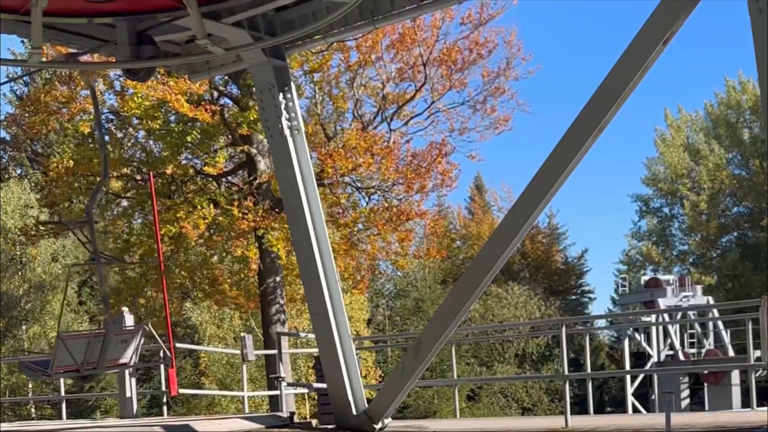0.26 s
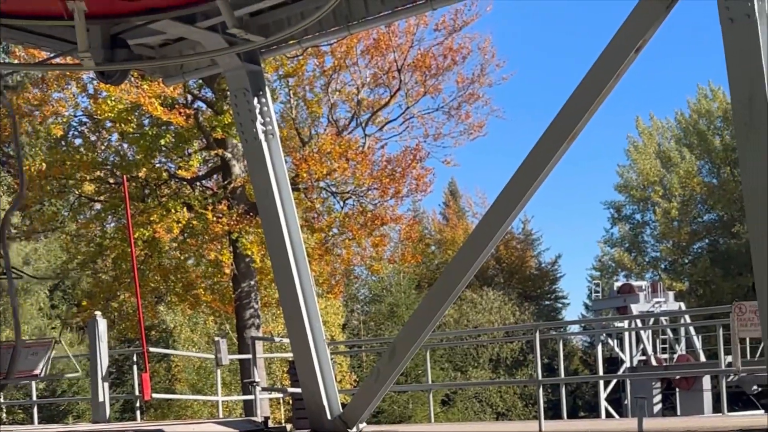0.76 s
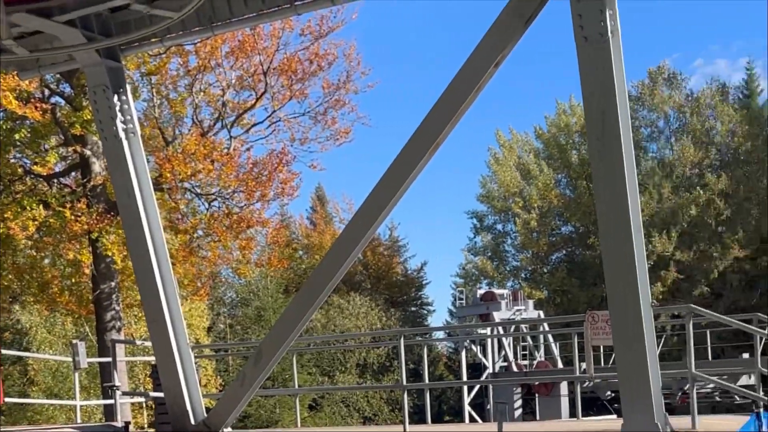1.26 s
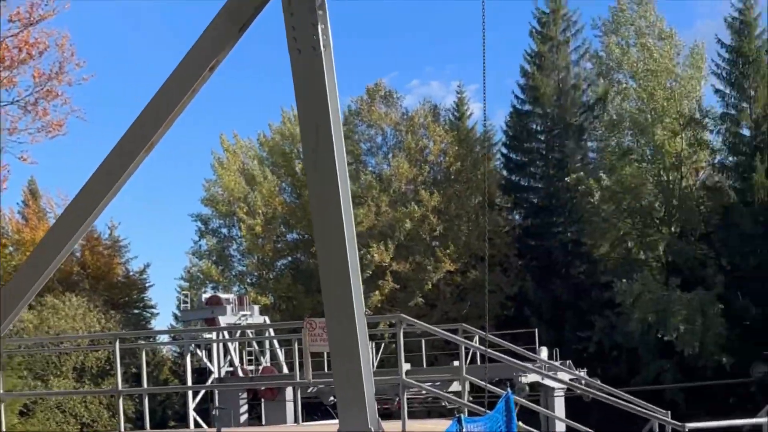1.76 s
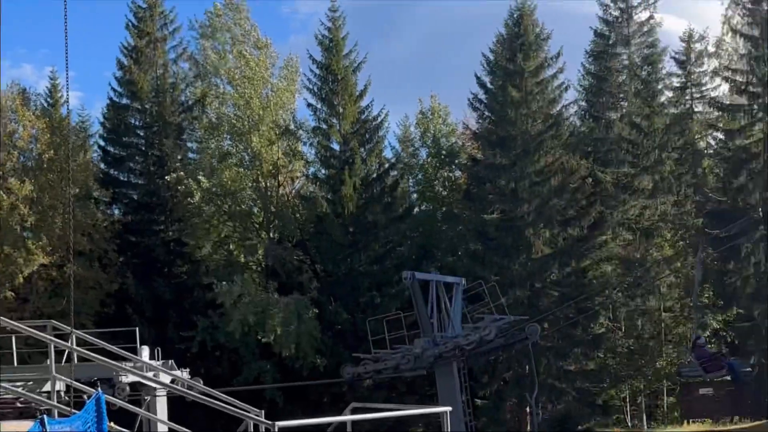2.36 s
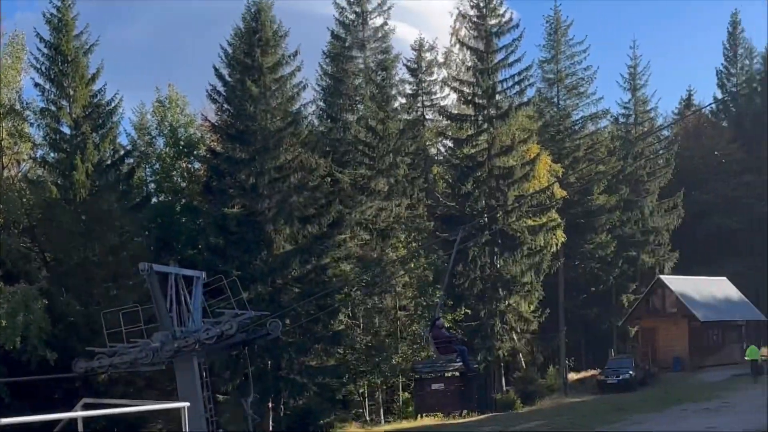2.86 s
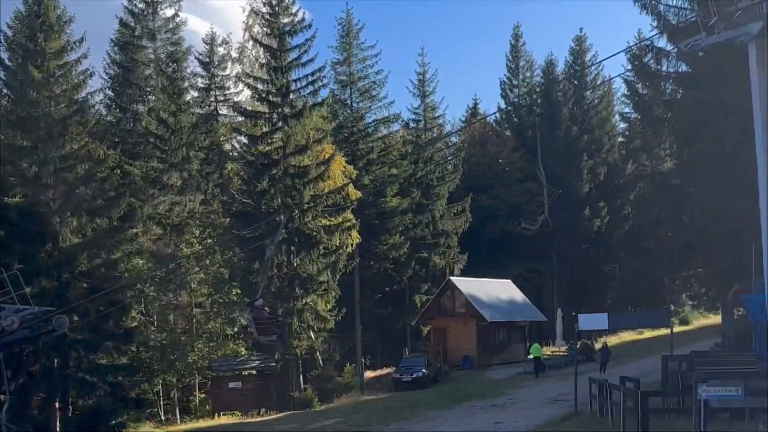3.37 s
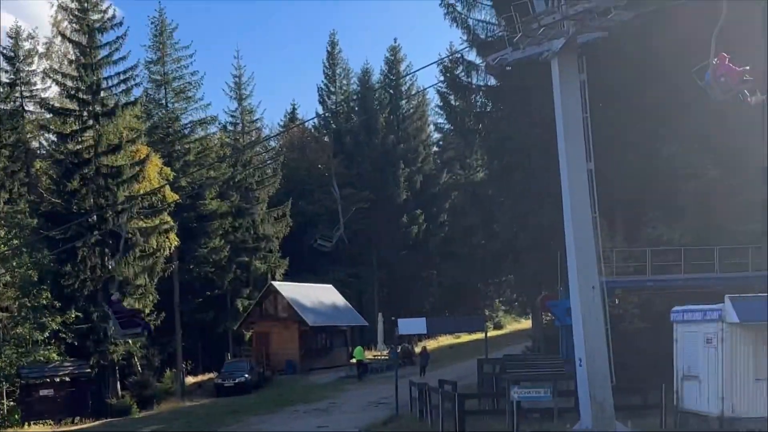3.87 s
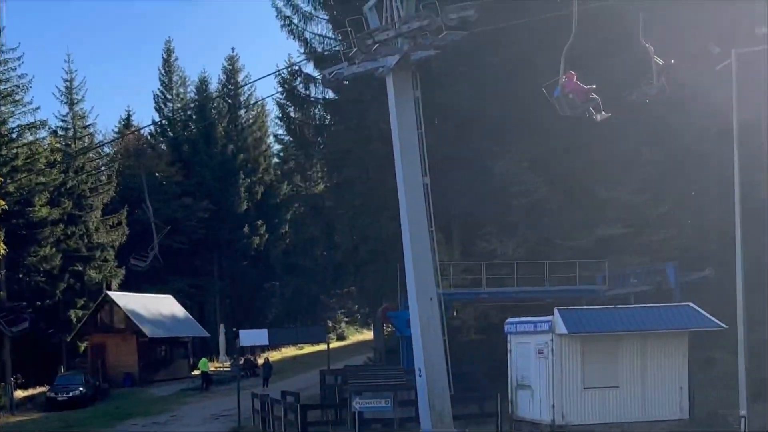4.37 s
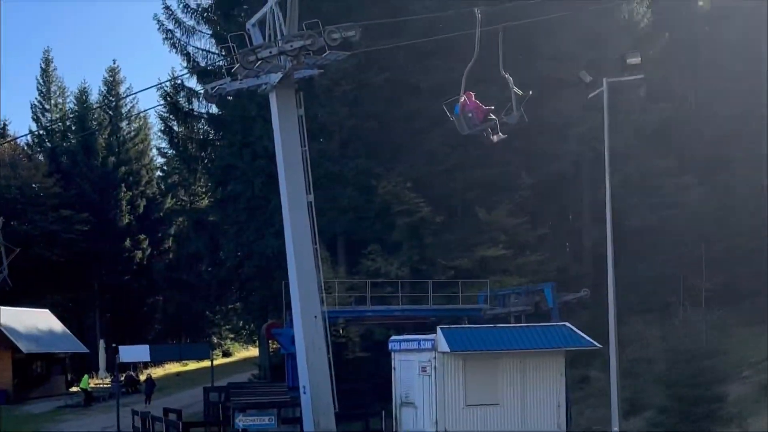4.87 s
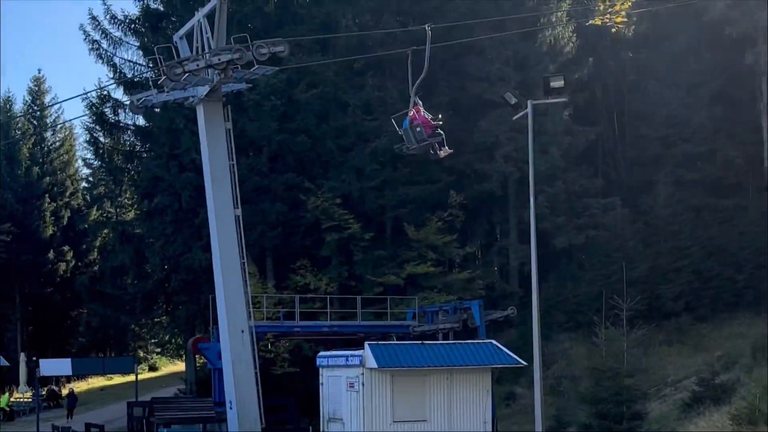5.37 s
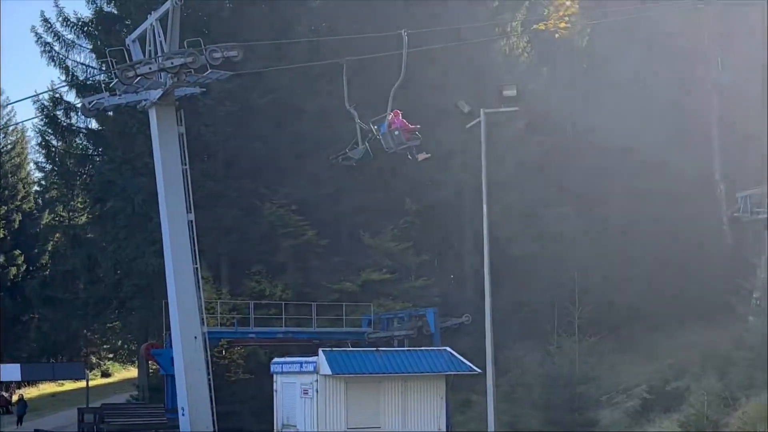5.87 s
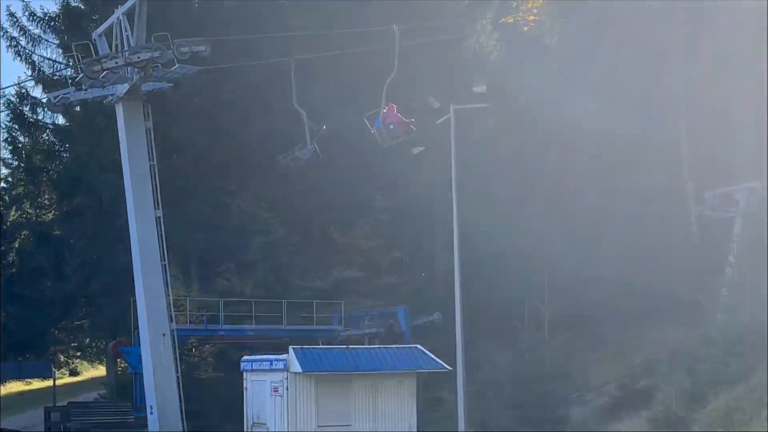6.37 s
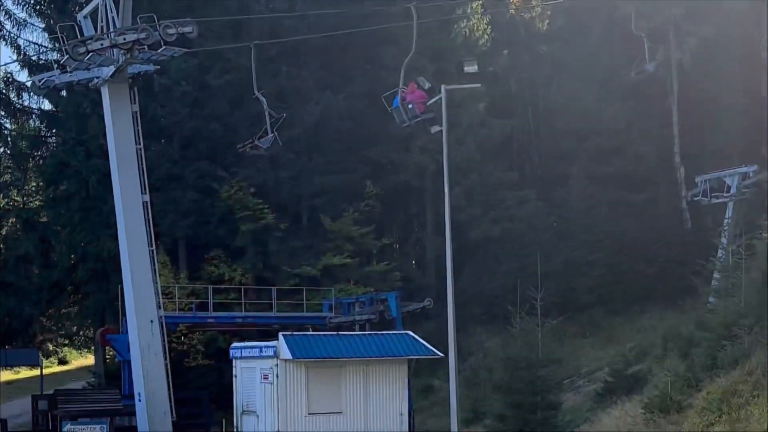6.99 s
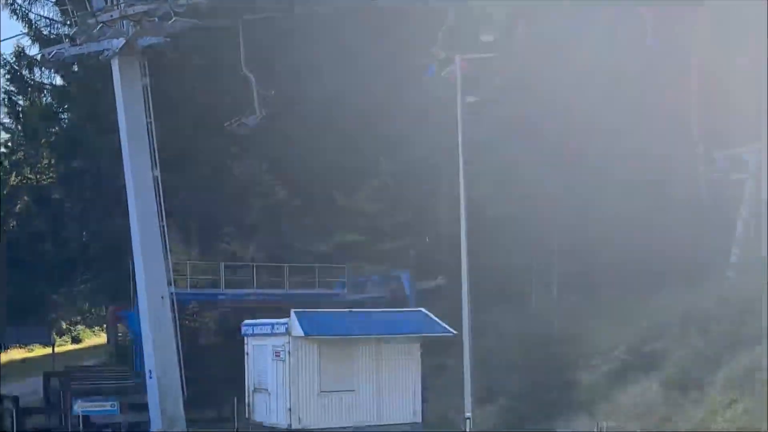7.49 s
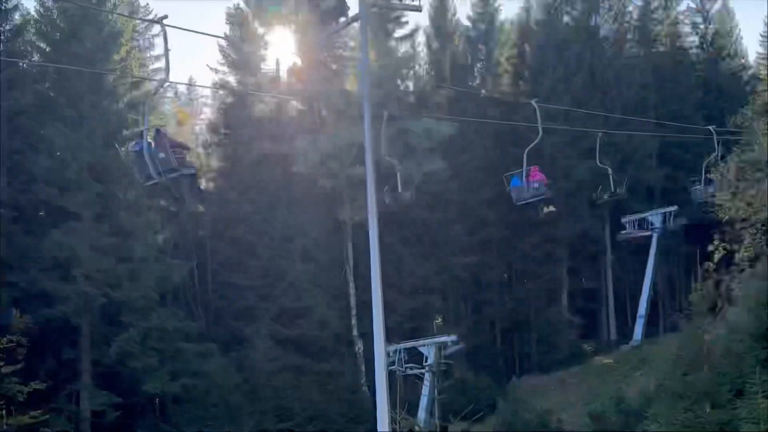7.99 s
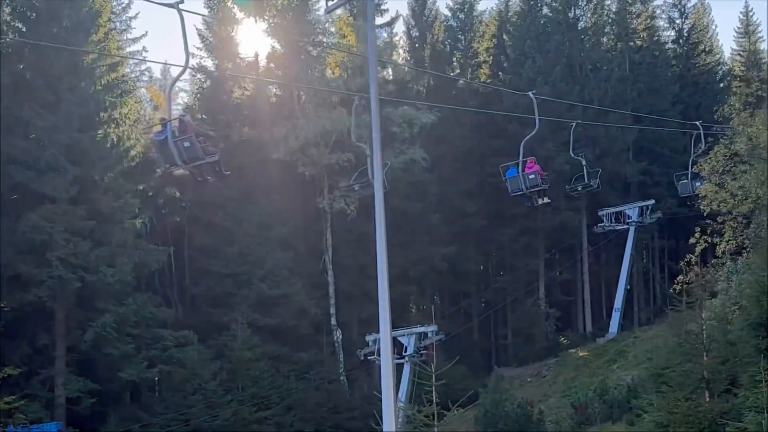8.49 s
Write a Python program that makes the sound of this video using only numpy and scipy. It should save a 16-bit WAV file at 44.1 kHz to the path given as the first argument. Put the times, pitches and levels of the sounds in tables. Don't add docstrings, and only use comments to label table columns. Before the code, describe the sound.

A chairlift drive drones loudly and steadily outdoors while shoes scuff grit nearby, then a click cuts to soft wind buffeting and forest hiss.

```python
import sys
import numpy as np
from scipy import signal
from scipy.fft import rfft, irfft, next_fast_len
from scipy.io import wavfile
from scipy.ndimage import uniform_filter1d, map_coordinates

SR = 44100
rng = np.random.default_rng(int(sys.argv[2]) if len(sys.argv) > 2 else 0)


def voltage_ratio(decibels):
    exponent = np.asarray(decibels, float) / 20
    return 10 ** exponent


def generate_wav(signal):
    frames = np.transpose(np.atleast_2d(signal))
    scaled = np.clip(frames, -1, 1) * 32767
    pcm = np.round(scaled).astype(np.int16)
    wavfile.write(sys.argv[1], SR, pcm)


N = 385434
CHANGE_S = 7.9278

HEADING_TIMES = [1, 2.63, 6.04]
# (frequency [Hz], level [dB per Hz])
FRAME_COLOUR = [(12, -58), (20, -36), (43, -17.5), (71, -15.5), (140, -5.5), (195, -9.5), (258, -11.5),
                (323, -9.5), (422, -19.5), (700, -33), (910, -61.5), (1540, -120)]
# (frequency [Hz], side minus mid [dB])
FRAME_WIDTH = [(60, -14), (110, -32.5), (190, -30), (340, -25), (600, -6), (1080, -8), (1920, 2),
               (3410, 13.5), (6080, -1), (10800, 9.5)]
# (frequency [Hz], side minus mid [dB])
WIND_WIDTH = [(60, -16), (110, -3), (190, -0.5), (340, 4), (600, 7), (1080, 8.5), (1920, 0), (3410, -1.5),
              (6080, 0.5), (10800, 0.5)]


def unit(x):
    return x / np.sqrt(np.mean(x ** 2) + 1e-20)


def along(points, hz):
    f, v = np.transpose(points)
    return np.interp(np.log(hz + 1), np.log(f + 1), v)


def curves(rows):
    s, *columns = np.transpose(rows)
    return [np.interp(np.arange(N) / SR, s, column) for column in columns]


def wobble(rate):
    at = np.arange(0, N + 32, 32)
    knots = rng.standard_normal(int(N * rate / SR) + 4)
    return np.interp(np.arange(N), at, map_coordinates(knots, [at * rate / SR]))


def filtered(x, response):
    size = next_fast_len(N + 8192)
    hz = np.fft.rfftfreq(size, 1 / SR)
    return irfft(rfft(x, size) * response(hz), size)[..., :N]


def rush(mid_db, side_db, link, patchy_db):
    # (frequency [Hz], phase [radians])
    left_lead = [(0, 7), (520, -1), (1210, -1), (1640, 1.5), (2670, -1.5), (4130, -4.5), (4740, 4),
                 (5170, -12.5), (5510, -7.5), (6980, -8), (8270, -7.5), (9730, -2), (10300, -13),
                 (11000, -12.5)]
    grid = signal.stft(rng.standard_normal((2, N)), nperseg=512)[2]
    patches = uniform_filter1d(rng.standard_normal(grid.shape[1:]), size=6, axis=0)
    patches = unit(uniform_filter1d(patches, size=12, axis=1))
    a, b = signal.istft(grid * voltage_ratio(patchy_db * patches), nperseg=512)[1][:, :N]

    def share(hz):
        return np.clip(link, 0, 1) * np.sin(along(left_lead, hz))

    mid = filtered(a, lambda hz: voltage_ratio(mid_db(hz)))
    side = filtered(a, lambda hz: voltage_ratio(side_db(hz)) * 1j * share(hz))
    side = side + filtered(b, lambda hz: voltage_ratio(side_db(hz)) * np.sqrt(1 - share(hz) ** 2))
    return np.array([mid + side, mid - side]) / np.std(mid)


def paired(colour, width, link, patchy_db):
    return rush(lambda hz: along(colour, hz), lambda hz: along(colour, hz) + along(width, hz), link, patchy_db)


def bursts(rows, bed_db):
    t = np.arange(0, N, 32) / SR
    swells = 0
    for s, db, rise, fall in rows:
        swells = swells + voltage_ratio(db - 20 * np.maximum((s - t) / abs(rise), (t - s) / abs(fall)))
    return voltage_ratio(bed_db) + np.interp(np.arange(N) / SR, t, swells)


def pops(rows, cycles):
    half = SR // 20
    out = np.zeros((2, N + SR))
    t = np.arange(-half, half) / SR
    for s, db, hz, pan_db, sign in rows:
        bell = np.exp(-(t * hz / cycles) ** 2 / 2)
        pop = bell * np.sin(2 * np.pi * (hz * t + rng.random())) * [[1], [sign]]
        out[:, round(s * SR) - half:][:, :len(t)] += voltage_ratio(db + np.minimum([[pan_db], [-pan_db]], 0)) * pop
    return out[:, :N]


def tone(turns, hz, level_db, drift, swim_db=0):
    step = 64

    def slow(rate):
        return map_coordinates(rng.standard_normal(40), [np.arange(0, N, step) * rate / SR])

    wide = min(hz / 600, 1) ** 2
    lead = min(hz, 1000) / 1700 + 0.12 * wide * slow(1.229)
    lean_db = 3 * wide * slow(1.218)
    gain = np.sqrt(2) * voltage_ratio(level_db[::step] + swim_db * slow(1.434) + [lean_db, -lean_db])
    shift = 2 * np.pi * rng.random() + drift * slow(3.5) + [lead, -lead]
    gain = np.repeat(gain, step, axis=1)[:, :N]
    shift = np.repeat(shift, step, axis=1)[:, :N]
    return gain * np.sin(np.float32(2 * np.pi * (turns % 1) + shift))


def forest():
    # (frequency [Hz], level [dB per Hz])
    leaf_colour = [(600, -19), (1200, -8.5), (2500, -15.5), (5000, -17), (8000, -27), (11000, -44),
                   (15500, -49)]
    fade_in = np.clip((np.arange(N) / SR - CHANGE_S) / 0.062, 0, 1)
    return voltage_ratio(-47) * fade_in * paired(leaf_colour, WIND_WIDTH, link=.2, patchy_db=1.8)


def wind_buffets():
    # (time [s], thud [dB], flutter [dB])
    gusts = [(7.972, -18.5, -28), (7.985, -22, -16.5), (8.0, -37, -29), (8.033, -23, -20),
             (8.066, -28, -26), (8.1, -23, -27.5), (8.195, -35, -27), (8.218, -21, -28.5), (8.27, -30, -50),
             (8.292, -26, -28), (8.343, -23, -28), (8.38, -24, -27), (8.415, -25, -50), (8.49, -28, -31),
             (8.52, -23, -28), (8.575, -46, -38), (8.62, -34, -31), (8.655, -30, -32)]
    # (frequency [Hz], level [dB per Hz])
    thud_colour = [(12, -45), (20, -52), (62, -1), (173, -12), (236, -12), (400, -24.5), (520, -61),
                   (880, -120)]
    # (frequency [Hz], level [dB per Hz])
    flutter_colour = [(88, -26), (150, -10), (236, -2), (272, 0), (641, -7), (1000, -16.5), (1350, -38),
                      (2600, -63), (4400, -120)]
    thuds = bursts([(s, db, 0.061, 0.061) for s, db, _ in gusts], bed_db=-32)
    flutters = bursts([(s, db, 0.021, 0.018) for s, _, db in gusts], bed_db=-37.5)
    fade_in = np.clip((np.arange(N) / SR - CHANGE_S) / .05, 0, 1) ** 2
    unrest = fade_in * voltage_ratio(1.5 * np.array([wobble(60), wobble(60)]))
    thud = thuds * voltage_ratio(-1.0) * unrest * paired(thud_colour, WIND_WIDTH, link=0, patchy_db=0.0)
    flutter = flutters * voltage_ratio(-2.0) * unrest * paired(flutter_colour, WIND_WIDTH, link=0, patchy_db=-2.0)
    return thud + flutter


def wind_pops():
    # time [s], peak [dB], pitch [Hz], left-right [dB], ports together 1 or opposed -1
    first_whirl = (7.972, -13, 280, 4, 1)
    # (time [s], peak [dB], pitch [Hz], left-right [dB], ports together 1 or opposed -1)
    whirls = [(7.985, -10, 403, 7, 1), (8.012, -19, 403, 11, -1), (8.018, -17, 143, 15, 1),
              (8.028, -21, 508, 9, -1), (8.035, -15, 254, 4, 1), (8.048, -23, 640, -10, -1),
              (8.073, -23, 570, 6, -1), (8.115, -21, 508, -1, -1), (8.19, -23, 640, -2, -1),
              (8.197, -18, 453, 4, -1), (8.21, -16, 254, 9, -1), (8.212, -21, 570, -5, -1),
              (8.216, -19, 359, -9, -1), (8.232, -21, 508, -8, -1), (8.238, -18, 143, -11, 1),
              (8.276, -20, 254, 4, -1), (8.287, -16, 143, -6, -1), (8.288, -19, 640, -3, -1),
              (8.332, -17, 403, -5, -1), (8.334, -22, 905, 2, -1), (8.338, -16, 160, -3, 1),
              (8.351, -21, 570, -1, -1), (8.352, -19, 320, 11, -1), (8.383, -19, 226, 5, 1),
              (8.385, -21, 570, -4, -1), (8.425, -20, 403, 4, -1), (8.472, -18, 143, -8, -1),
              (8.505, -19, 453, -2, -1), (8.516, -20, 285, 7, 1), (8.518, -19, 180, 4, 1),
              (8.541, -20, 254, -15, -1), (8.565, -24, 508, -2, -1), (8.624, -22, 113, 7, 1),
              (8.656, -23, 160, 8, -1), (8.662, -27, 718, -2, -1), (8.662, -23, 254, 5, 1),
              (8.695, -21, 101, 15, 1), (8.697, -28, 905, -2, -1), (8.721, -27, 640, 1, -1)]
    # (time [s], peak [dB], pitch [Hz], left-right [dB])
    slaps = [
        (8.213, -28, 530, 5),
        (8.292, -25, 554, 8),
        (8.296, -33, 780, 2),
        (8.383, -29, 740, 2),
        (8.464, -38, 675, 2),
        (8.516, -43, 6000, 0),
        (8.517, -45, 9200, 0),
    ]
    together = [(*row, 1) for row in slaps]
    return voltage_ratio(0.5) * pops([first_whirl] + whirls + together, cycles=1.55)


def wind():
    return wind_buffets() + forest() + wind_pops()


def scuffs():
    # (time of peak [s], fizz [dB], rise [s], fall [s], scrape above fizz [dB])
    drags = [(0, -48.5, .02, .2, 5.5), (.12, -46.5, 0.055, 0.14, 6.5), (.47, -49.5, 0.055, 0.056, -5),
             (1.43, -43.5, 0.57, 0.19, 1.5), (1.57, -40, 0.3, 0.071, -3.5), (1.7, -59.5, .05, 0.19, 2),
             (1.87, -58.5, 0.07, 0.42, 3.5), (2.472, -46.5, 0.044, 0.087, 7.5),
             (2.746, -52.5, 0.35, .2, 13), (2.85, -39, 0.068, 0.18, -3), (3.1, -52.5, 0.062, .11, 6),
             (3.15, -37, 0.006, .08, -1), (3.195, -31.5, 0.058, 0.13, 6.5), (3.26, -42, 0.077, 0.26, 8),
             (3.531, -49, 0.14, 0.17, 7.5), (3.63, -53.5, 0.051, 0.095, 14.5)]
    # (frequency [Hz], level [dB per Hz])
    fizz_colour = [(2000, -31), (3500, 0), (6000, 9), (8000, 0), (11000, -13), (15000, -13.5)]
    # (frequency [Hz], level [dB per Hz])
    scrape_colour = [(300, -11.5), (700, 5.5), (1000, -0.5), (1500, -1), (3000, -5.5), (5000, -14.5),
                     (8000, -34.5), (12000, -63)]
    shuffle_db = -51.5 - 20 * np.maximum(np.arange(N) / SR - 2.9, 0) / .9
    fizz = bursts([row[:4] for row in drags], shuffle_db)
    scrape = bursts([(s, db + above_db, rise, fall) for s, db, rise, fall, above_db in drags], shuffle_db + 0.5)
    grains = voltage_ratio(1.1 * wobble(300) + 0.97 * wobble(45))
    out = fizz * grains * paired(fizz_colour, [(3000, 1.5)], link=.4, patchy_db=2.5)
    return out + scrape * grains * paired(scrape_colour, [(500, -4), (4000, 1.5)], link=.4, patchy_db=2.5)


def stone_ticks():
    # (time [s], peak [dB], pitch [Hz], left-right [dB])
    knocked = [
        (2.469, -29.5, 5200, 0.5),
        (2.6592, -35, 4130, 14),
        (3.147, -16, 4640, -2),
        (3.1867, -52.5, 5830, 1),
        (3.218, -29.5, 3600, -7.5),
        (3.63, -35, 4080, 5.5),
        (3.6986, -34.5, 3800, 4.5),
        (3.9328, -26, 4970, 0),
    ]
    out = np.zeros((2, N))
    t = np.arange(SR // 20) / SR
    for s, db, hz, pan_db in knocked:
        ring = np.sin(2 * np.pi * hz * t + [[1.2], [-0.6]]) * voltage_ratio(-60 * t / 0.04)
        crack = 0.98 * rng.standard_normal((2, len(t))) * voltage_ratio(-60 * t / .025)
        gain = voltage_ratio(db + 0.5 + np.array([[pan_db], [-pan_db]]) / 2)
        out[:, round(s * SR):][:, :len(t)] += gain * (ring + crack)
    return filtered(out, lambda hz: (1j * hz * 4000 / (4300 ** 2 - hz ** 2 + 1j * hz * 4000)) ** 2)


def pebbles():
    # (time [s], peak [dB], pitch [Hz], left-right [dB])
    clacks = [(2.472, -34, 2300, 0), (2.478, -32, 2000, -2), (3.171, -30, 1550, 0), (3.184, -26, 960, 1),
              (3.19, -30, 2960, 0), (3.196, -29, 1700, 0), (3.207, -24, 910, 0), (3.212, -27, 2480, -4),
              (3.225, -28, 2440, -3), (3.25, -26, 1010, 0), (3.271, -26, 900, 0), (3.632, -35, 2100, 0),
              (3.635, -36, 4500, 2), (3.934, -35, 3900, -3), (3.935, -37, 2500, -3), (3.944, -37, 5000, -2),
              (3.957, -35, 5000, -2), (4.2, -28, 686, 9), (5.97, -26, 740, 0), (7.13, -30, 700, 4),
              (7.18, -31, 690, 4)]
    # (time [s], peak [dB], pitch [Hz], left-right [dB])
    snaps = [(2.47, -33, 4800, -4), (2.471, -36, 9500, -2), (2.669, -33, 4276, 15), (2.75, -32, 4000, 0),
             (2.852, -33, 6788, 1), (2.855, -37, 9500, -1), (2.828, -34, 5960, 0), (3.148, -34, 7600, -1),
             (3.149, -29, 1890, 0), (3.149, -31, 10700, -1), (3.189, -35, 6788, 0), (3.209, -27, 3394, 6),
             (3.214, -34, 6788, -7), (3.222, -37, 3850, 10), (3.225, -33, 6788, 3)]
    return pops([(*row, 1) for row in clacks + snaps], cycles=4.6)


def squeak():
    band = [(3400, -39.0), (4100, 6.5), (4500, -6), (4900, -12), (5400, -36.5)]  # (Hz, dB per Hz)
    twist = bursts([(2.662, -40, .015, .16)], bed_db=-120)
    return twist * paired(band, [(4000, 7)], link=.4, patchy_db=3.0)


def shoes():
    return scuffs() + stone_ticks() + pebbles() + squeak()


def fan_rush(rush_db):
    # (frequency [Hz], level [dB per Hz])
    mid_colour = [(240, -26), (400, -1), (615, -7), (668, -9), (800, -8.5), (1890, -23.5), (2200, -21),
                  (6490, -33), (9580, -46.5), (11000, -63.5), (14300, -91), (22000, -120)]
    # (frequency [Hz], level [dB per Hz])
    side_colour = [(240, -38), (400, -9.5), (590, -6), (850, -12), (1210, -15.5), (1900, -26.5),
                   (2150, -19), (2700, -20), (4800, -31), (5500, -24), (8000, -40.5), (11300, -54.5),
                   (15500, -60.5)]
    air = rush(lambda hz: along(mid_colour, hz), lambda hz: along(side_colour, hz) + 0.4, link=.85, patchy_db=1)
    return voltage_ratio(rush_db + 5.5) * air


def frame_rumble(rush_db):
    rumble = paired(FRAME_COLOUR, FRAME_WIDTH, link=.6, patchy_db=2.0)
    return voltage_ratio(-21.0 + 1.38 * (rush_db + 34.0)) * rumble


def frame_knocks():
    # (time [s], level [dB])
    jolts = [(.88, -13), (1.34, -19), (1.48, -18), (1.81, -36), (2.6, -29), (4.26, -24), (4.92, -20.5),
             (5.16, -16), (5.4, -24.5), (5.559, -23.5), (5.93, -17), (6.2, -21), (6.55, -16.5), (6.87, -21),
             (7.52, -18), (7.83, -25)]
    gain = bursts([(s, db, 0.15, 0.048) for s, db in jolts], bed_db=-29.5)
    lows = [(hz, db - 30 * (hz > 100)) for hz, db in FRAME_COLOUR]
    return gain * voltage_ratio(-7.5 + 2.2 * wobble(9)) * paired(lows, FRAME_WIDTH, link=.3, patchy_db=-0.5)


def machine_noise():
    heard_db = (-35, -35, -37)
    rush_db = np.interp(np.arange(N) / SR, HEADING_TIMES, heard_db) + .2 * wobble(2.5) + .3 * wobble(6.5)
    return frame_knocks() + frame_rumble(rush_db) + fan_rush(rush_db)


def electric_hum():
    # (time [s], level [dB])
    swell = [(0.0, -42), (0.15, -25), (0.26, -33), (2.03, -23.5), (2.65, -32), (3.31, -21.5), (3.57, -37.5),
             (4.28, -22), (4.43, -37.5), (4.79, -22.5), (4.94, -40.5), (5.27, -24), (5.84, -38.5),
             (6.04, -19.5), (6.17, -41.5), (6.53, -24), (7.19, -37), (7.92, -30)]
    # (facing [dB], side-on [dB], turned away [dB])
    multiples_db = [(-49, -47, -47), (-56, -51, -52), (-60, -60, -65), (-64, -66, -64), (-57, -60, -65),
                    (-63, -59, -69), (-65, -62, -69), (-67, -65, -70)]
    ripple_hz = 300.05
    t = np.arange(N) / SR
    out = tone(ripple_hz * t, ripple_hz, curves(swell)[0], drift=0.17)
    for k, heard_db in enumerate(multiples_db, 2):
        level_db = np.interp(t, HEADING_TIMES, heard_db)
        out += tone(k * ripple_hz * t, k * ripple_hz, level_db, drift=0.12, swim_db=3.0)
    return out


def panel_groans(turns, rate):
    # (time [s], level [dB], pitch [per shaft turn], swell or fade per 20 dB [s], sag [Hz per s])
    groans = [
        (2.9, -30, 33.9, .2, 110),
        (3.51, -30, 33.7, .14, 60),
        (7.4, -34, 35.4, 1.3, 0),
    ]
    t = np.arange(N) / SR
    out = np.zeros((2, N))
    for s, db, order, swell_s, sag in groans:
        level_db = db - 20 * np.abs(t - s) / swell_s
        out += tone(order * turns - sag * (t - s) ** 2 / 2, order * rate, level_db, drift=0.14)
    return out


def turning_notes(turns, rate):
    shaft_orders = [7, 8, 10, 11, 12, 13, 20, 23, 27, 30]
    # (facing [dB], side-on [dB], turned away [dB])
    shaft_levels = [(-31, -35, -34), (-34, -29, -29), (-36, -28, -32), (-30, -39, -38), (-32, -34, -37),
                    (-46, -38, -37), (-33, -35, -39), (-37, -41, -44), (-43, -43, -41), (-43, -42, -45)]
    gear_orders = [4.75, 9.5, 10.75, 12.25, 14.25, 19.75, 20.75, 21.5, 22.5, 34.5]
    # (facing [dB], side-on [dB], turned away [dB])
    gear_levels = [(-36, -39, -41), (-33, -30, -33), (-30, -38, -40), (-41, -39, -38), (-36, -36, -36),
                   (-26, -37, -42), (-43, -36, -36), (-41, -37, -36), (-41, -42, -42), (-55, -48, -52)]
    whine_orders = [36.88, 46.11, 165.6]
    # (facing [dB], side-on [dB], turned away [dB])
    whine_levels = [(-50, -48, -47), (-53, -50, -51), (-66, -57, -58)]
    t = np.arange(N) / SR
    orders = shaft_orders + gear_orders + whine_orders
    out = np.zeros((2, N))
    for order, heard_db in zip(orders, shaft_levels + gear_levels + whine_levels):
        level_db = np.interp(t, HEADING_TIMES, heard_db)
        out += tone(order * turns, order * rate, level_db, drift=0.38, swim_db=2.84 * min(1, 60 / order))
    return out


def standing_wave_notes(turns, rate):
    orders = [6, 9, 15, 18, 20.25, 21, 23.75, 24, 41.5, 73.77, 129.09, 133.7, 138.31, 142.92]
    # (time [s], order 6 [dB], order 9 [dB])
    main_hums = [(0.0, -30, -16.5), (0.15, -25, -14.5), (0.7, -26.5, -13.5), (0.86, -19, -13),
                 (0.97, -28, -13), (1.41, -24, -17), (1.68, -20.5, -14), (2.03, -23, -17), (2.27, -22, -49),
                 (2.32, -21, -25), (2.78, -25, -11.5), (4.83, -17, -14), (6.17, -22, -17), (7.19, -20, -13),
                 (7.88, -20, -15.5), (7.92, -25, -13)]
    # (time [s], orders 15, 18, 20.25, 21, 23.75 and 24 [dB each])
    shaft_gear_growl = [(0.15, -28, -43, -26.5, -28.5, -39, -37), (0.5, -43, -32, -33, -19.5, -32, -42),
                        (1.0, -38, -36, -27, -23, -29, -26.5), (1.5, -34, -39, -26.5, -24, -31, -38),
                        (2.0, -36, -26, -22.5, -27, -45, -29.5), (2.5, -32, -32.5, -27.5, -34, -35, -32.5),
                        (3.0, -37, -34, -24.5, -26.5, -37.5, -29.5), (3.5, -31.5, -43, -29, -28.5, -31.5, -32),
                        (4.0, -33, -37.5, -24, -28, -28.5, -34), (4.5, -37.5, -38, -27, -35, -42, -35),
                        (5.0, -37.5, -38, -29, -32, -38, -35.5), (5.5, -37.5, -28.5, -26.5, -30.5, -38.5, -32),
                        (6.0, -37, -29, -27.5, -32, -36, -37.5), (6.5, -38, -36.5, -27.5, -32, -38, -31.5),
                        (7.0, -33, -37, -25, -26.5, -43, -41.5), (7.5, -32.5, -48, -30.5, -27, -45, -32.5),
                        (7.8, -29, -41, -25, -27, -43, -33)]
    # (time [s], orders 41.5, 73.77, 129.09, 133.7, 138.31 and 142.92 [dB each])
    slot_whine = [(0.15, -56, -58, -56, -52, -59, -71), (0.5, -44, -63, -59, -50.5, -68, -62),
                  (1.0, -54, -55, -75, -52, -71, -63), (1.5, -45, -74, -55, -59, -69, -78),
                  (2.0, -39, -61, -53, -57, -62, -70), (2.5, -37.5, -39, -55, -46, -64, -79),
                  (3.0, -39, -46.5, -64, -55, -64, -66), (3.5, -38.5, -58, -67, -49, -61, -67),
                  (4.0, -38.5, -61, -58, -56, -61, -67), (4.5, -40, -46, -64, -49, -67, -68),
                  (5.0, -36.5, -49.5, -68, -51.5, -76, -64), (5.5, -33, -48.5, -58, -60, -63, -63),
                  (6.0, -33.5, -50, -62, -56, -70, -67), (6.5, -34, -52, -62, -63, -71, -69),
                  (7.0, -38, -62, -59, -63, -65, -83), (7.5, -48.5, -59, -66, -61, -83, -69),
                  (7.8, -47, -60, -59, -67, -74, -67)]
    levels = curves(main_hums) + [db + 0.35 for db in curves(shaft_gear_growl) + curves(slot_whine)]
    out = np.zeros((2, N))
    for order, level_db in zip(orders, levels):
        drift = 0.083 + 0.13 * (order > 9) + .6 * (order > 100)
        out += tone(order * turns, order * rate, level_db, drift, swim_db=0.27 + 0.54 * (order > 30))
    return out


def drive():
    # (time [s], speed [turns per s])
    speed = [(0.0, 16.286), (0.5, 16.288), (1.0, 16.288), (1.4, 16.25), (1.9, 16.07), (2.5, 15.96),
             (3.0, 15.862), (3.5, 15.846), (4.0, 15.848), (4.5, 15.872), (5.0, 15.9), (5.5, 15.918),
             (6.0, 15.898), (6.5, 15.858), (7.0, 15.822), (7.5, 15.824), (7.93, 15.824)]
    turns = np.cumsum(curves(speed)[0]) / SR
    rate = turns[-1] / ((N - 1) / SR)
    notes = standing_wave_notes(turns, rate) + turning_notes(turns, rate)
    return notes + panel_groans(turns, rate) + electric_hum()


def bumps(rows, hz):
    return voltage_ratio(sum(db * np.exp(-((hz - centre_hz) / width) ** 2) for centre_hz, width, db in rows))


def ports(sound):
    # (centre [Hz], width [Hz], height [dB])
    sum_bumps = [
        (3580, 130, 1.5),
        (5320, 910, -4.5),
        (6940, 2500, -0.5),
    ]
    # (centre [Hz], width [Hz], height [dB])
    difference_bumps = [
        (2700, 300, 2),
        (4750, 350, 3),
        (5400, 500, -9.5),
        (6700, 550, -23.5),
    ]
    # (frequency [Hz], left minus right [dB])
    case_shade = [(60, -.2), (150, -.7), (300, -.3), (600, 2), (1100, .5), (2000, -1.2), (4000, .1),
                  (10000, -.3)]
    mid = filtered(sound[0] + sound[1], lambda hz: bumps(sum_bumps, hz) / (1 + (hz / 11200) ** 30))
    side = filtered(sound[0] - sound[1], lambda hz: bumps(difference_bumps, hz))

    def shade(hz):
        return voltage_ratio(np.clip(11000 - hz, 0, 1) * along(case_shade, hz) * np.array([[.5], [-.5]]))

    return filtered(np.array([mid + side, mid - side]) / 2, shade)


def scene():
    swing = [
        [-.15],
        [-.26],
    ]
    station = ports(machine_noise() + shoes() + drive())
    samples_left = round(CHANGE_S * SR) - np.arange(N)
    last_swing = np.cos(np.pi / 2 * np.clip(samples_left / 120, 0, 1)) ** 2
    station = station + last_swing * (swing - station[:, samples_left == 1])
    return np.where(samples_left > 0, station, ports(wind()))


def band_limit(x):
    return signal.sosfilt(signal.butter(12, 15750, fs=SR, output="sos"), x)


def record(dry):
    rounded = dry / (1 + np.abs(dry / 0.97) ** 6) ** (1 / 6)
    return band_limit(rounded)


dry = scene()
out = record(dry)
generate_wav(out)
```